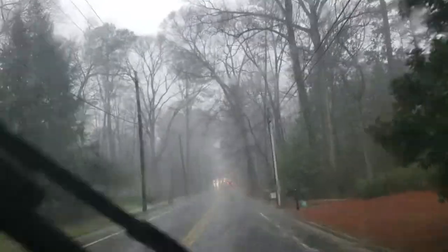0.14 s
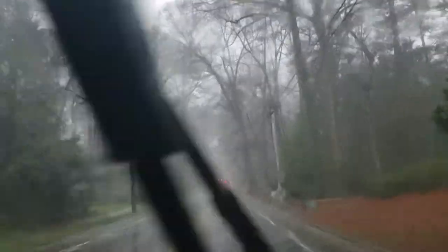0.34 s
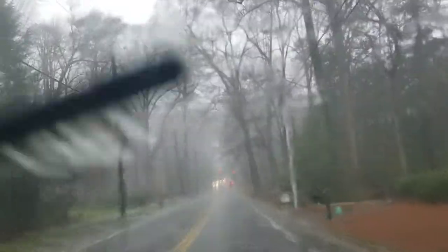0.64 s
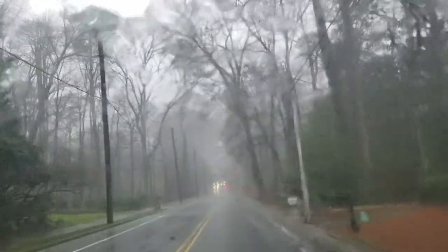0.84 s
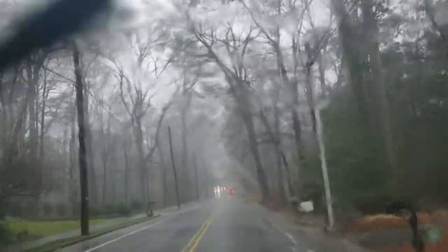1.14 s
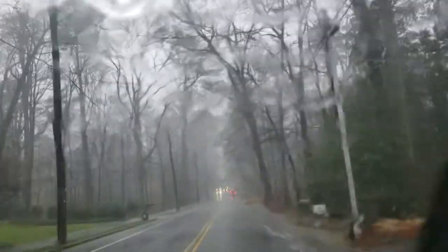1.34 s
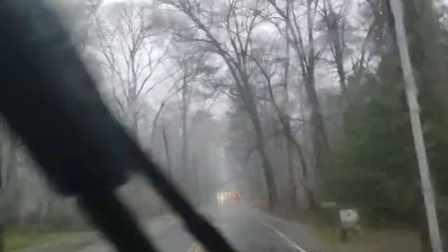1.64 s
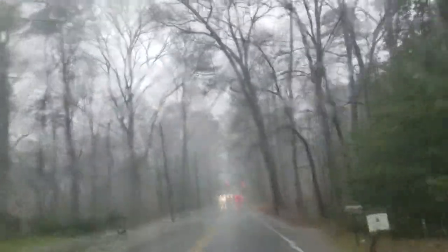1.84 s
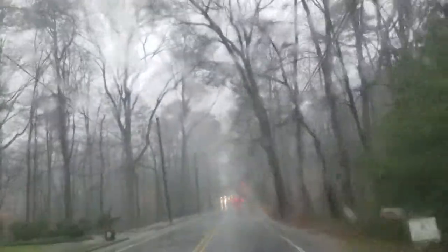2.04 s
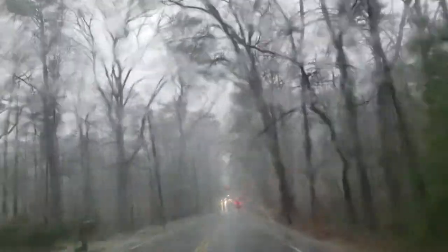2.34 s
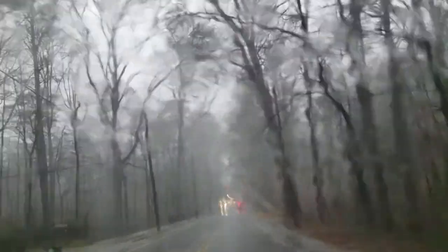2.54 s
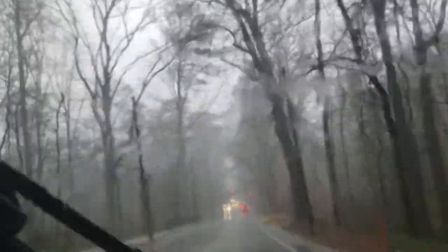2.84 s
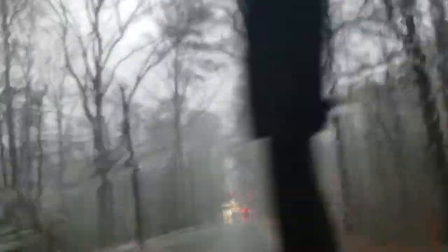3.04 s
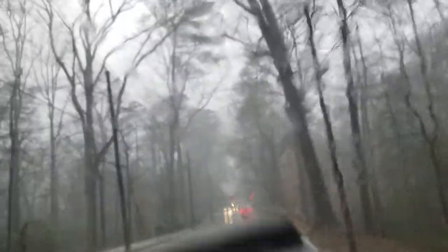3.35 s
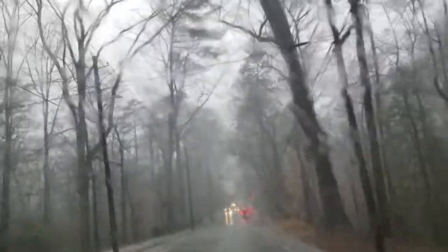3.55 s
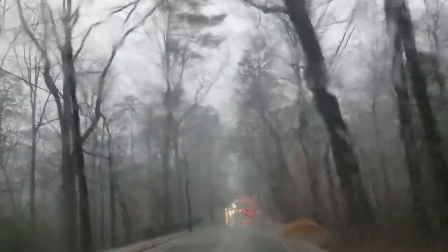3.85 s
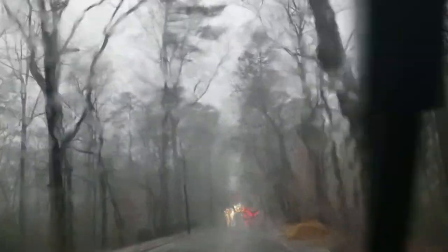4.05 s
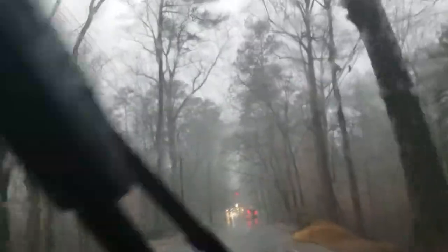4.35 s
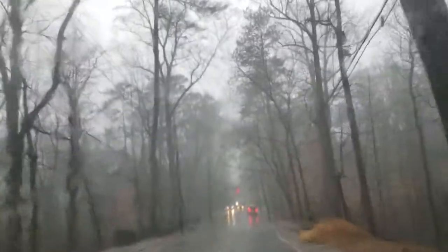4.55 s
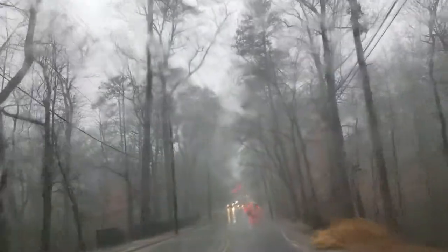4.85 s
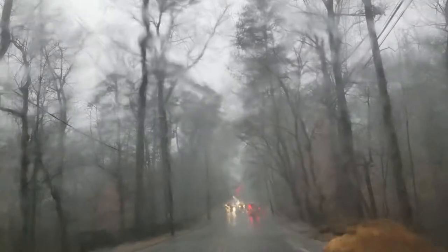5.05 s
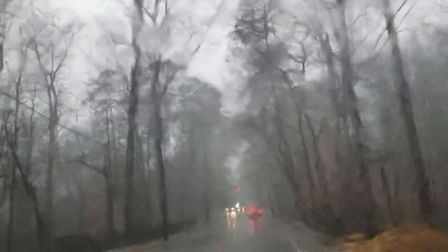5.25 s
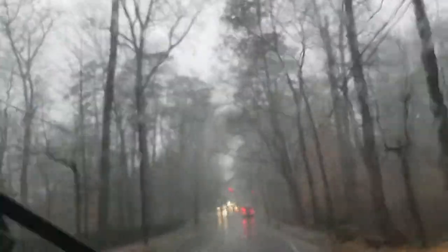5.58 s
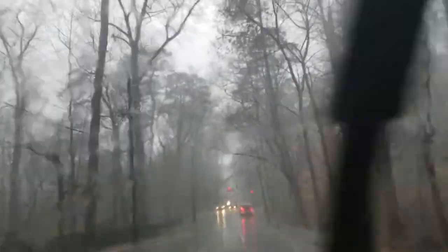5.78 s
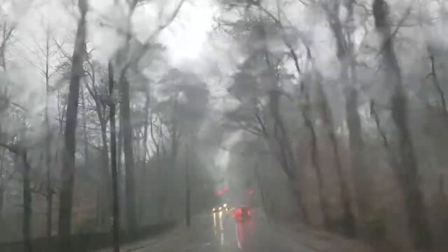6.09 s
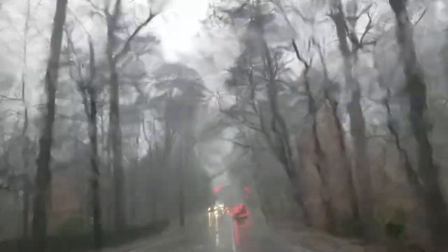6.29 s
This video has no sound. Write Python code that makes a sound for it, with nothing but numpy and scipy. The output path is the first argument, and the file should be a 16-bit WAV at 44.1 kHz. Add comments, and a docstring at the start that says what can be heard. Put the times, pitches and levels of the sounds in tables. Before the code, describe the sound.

From the front seat of a moving car, steady rain hisses and patters on glass and roof. A short wiper hum comes early, the rain thins near one second, then builds again. Dull low bumps jolt the body in the first three seconds. From about two and a half seconds, fat drops crack sharply and densely on the windshield, with brief splashing sheets, over deep tyre rumble and a drone that grows and sinks in pitch.

```python
"""Heavy rain on the windshield and roof of a moving car, heard from the front seat, with fat drops,
drips and sheets of water from the trees; under it tyre rumble, cabin drone, wiper hums and jolts of the body.
Each drop is a noise crack of the glass plus a short cabin ring dying band by band; a sheet briefly lifts the rain.
Tyres are filtered noise, drone and wiper narrow noise bands that follow a pitch, jolts decaying sines with a
burst of knocking noise."""
import sys
import numpy as np
from scipy import signal
from scipy.fft import rfft, irfft
from scipy.io import wavfile
from scipy.ndimage import uniform_filter1d

SR = 44100
rng = np.random.default_rng(int(sys.argv[2]) if len(sys.argv) > 2 else 0)


def to_wav(s):
    """Save 16-bit WAV."""
    ch = np.atleast_2d(s).T  # columns
    pcm = np.round(np.clip(ch, -1, 1) * 32767)  # PCM
    wavfile.write(sys.argv[1], SR, pcm.astype(np.int16))


N = 283122
TIME = np.arange(N) / SR  # s

# strength of the steady rain: t/s, relative level/dB
DOWNPOUR = [(0, -37.5), (.38, -35), (.46, -43.5), (.93, -50.5), (1.0, -44), (1.3, -42.5), (1.76, -38),
            (2.85, -35.5), (3.24, -42.5), (3.95, -38), (4.35, -42), (5.5, -34.5), (6.42, -44)]


def rain(fine_db=2, body_db=1, fizz_db=3.0, coarse_db=0, coarse_dulls=0.22, fizz_growth=0.13,
         roof_db=-12, roof_growth=0.13):
    """Fine and coarse drops on glass and roof; treble and roof drumming grow faster than the water."""
    # coarse drops against the fine rain: t/s, relative level/dB
    coarse_curve = [(0, -10.5), (.6, 8), (1.3, -1), (2.3, -10.5), (2.7, -1), (3.6, 2.5), (4.9, 6.5),
                    (5.3, -14.5), (6, -4.5), (6.42, 9)]
    # sheet metal of the roof, muffled by its lining: f/Hz, relative gain/dB
    roof_spectrum = [(200, -29), (350, 3.5), (550, -7.5), (750, 13.5), (1150, 9), (1500, -1), (2500, -28),
                     (6000, -60)]
    level_db = water_db()
    share_db, = played(coarse_curve)
    fine = gain_of(fine_db) * patter(per_s=1400, spread_db=3.5, colour_db=4.5)
    coarse = gain_of(coarse_db + share_db) * patter(per_s=150, spread_db=6.0, colour_db=14.5)
    drops = fine + coarse

    top = irfft(rfft(drops) * treble(np.fft.rfftfreq(N, 1 / SR)), N)
    body = drops - top
    swell_db = level_db - level_db.mean()
    top_db = fizz_db - coarse_dulls * share_db + fizz_growth * swell_db
    glass = gain_of(level_db) * (gain_of(body_db) * body + gain_of(top_db) * top)

    drumming_db = level_db + roof_db + roof_growth * swell_db
    drumming = coloured(patter(per_s=300, spread_db=8, colour_db=8.5, count=16), roof_spectrum)
    return glass + gain_of(drumming_db) * drumming


def water_db(gust_rms_db=0.71, gust_hz=14.2, rise_s=0.0068, runoff_share=0.14):
    """Water hitting the car: wavering rain plus sheets off the trees, which rise, hold and run out."""
    # sheets: t/s, length/s, relative level/dB
    sheets = [(0.292, 0.095, -39), (.54, 0.18, -41), (2.433, 0.095, -32), (3.296, 0.071, -37.5),
              (3.977, 0.073, -35.5), (4.46, 0.035, -36), (4.9, 0.079, -31), (5.11, 0.35, -34.5),
              (5.796, 0.32, -31)]
    power = gain_of(played(DOWNPOUR)[0]) ** 2
    for s, length_s, db in sheets:
        rise = np.clip((TIME - s) / rise_s, 0, 1)
        fall = np.exp(-np.maximum(TIME - s - length_s, 0) / (runoff_share * length_s))
        power = power + (gain_of(db) * rise * fall) ** 2
    gust_band = [(1, -30), (gust_hz / 2, 0), (gust_hz, 0), (gust_hz * 10, -80)]  # f/Hz, gain/dB
    gusts = coloured(rng.standard_normal(N), gust_band)
    return 10 * np.log10(power) + gust_rms_db * gusts


def patter(per_s, spread_db, colour_db, count=72):
    """Drops at random moments, of random size, drawn from `count` spots of different colour; rms 1."""
    out = np.zeros((2, N))
    spots = []
    for a, b, c in rng.standard_normal((count, 3)):
        spots.append(impact(colour_db * a - 2.0, 2 * b, 2 * c, crack_s=0.00053, ring_db=2))
    chance = rng.random(N)
    sizes_db = spread_db * np.minimum(rng.exponential(1, N), 2)
    sizes = gain_of(sizes_db) * rng.choice([-1, 1], N)
    spot = rng.integers(0, count, N)
    for i in np.flatnonzero(chance < per_s / SR):
        add(out, i / SR, sizes[i] * spots[spot[i]])
    return evened(out)


def fat_drops(level_db=13, lead_s=.0003):
    """The single large drops that stand out of the rain."""
    # fattest drops: t/s, relative level/dB, extra treble/dB, extra hollow body/dB
    drop_rows = [(0.1787, -9, -11, 0), (0.665, -15, -4, 8), (0.7386, -14.5, 3, 9), (0.8803, -16, 12, 4),
                 (1.027, -15, -9, -24), (1.7022, -15.5, 17, -17), (2.3345, -5.5, -3, -8),
                 (2.4774, -3, 10, 4), (2.4828, -2.5, 12, 0), (2.5943, -6.5, -15, 1), (2.6035, -8, -10, 8),
                 (2.615, -.5, 4, 3), (2.6318, -4.5, -5, 1), (2.703, -5, -3, 0.5), (2.8119, -7, 23, 19),
                 (2.84, -8, 1, 12), (2.8948, -7, -2, -3), (2.9118, -4.5, -4.5, -0.5),
                 (2.963, -4.5, -13, -1), (2.971, -7.5, -30, 0), (3.0209, -3.5, 1.5, 3.5),
                 (3.3143, -10.5, -17, 1), (3.4452, -5.5, -7, 4), (3.5283, -5.5, 3, 2.5),
                 (3.6087, -5.5, -5, -2), (3.6482, -7, -17, 3), (3.6778, 2, 9, 4.5), (3.7118, -5, 6, 8),
                 (3.8952, -10, 10, -8), (3.9727, -5.5, -7, 3), (4.0019, -7, -3, 6), (4.0404, -9, -3, 11),
                 (4.093, -4.5, -0.5, -0.5), (4.2645, -4.5, 1.5, -5), (4.3177, -7, 4, 4.5),
                 (4.3851, -8, 9, 6), (4.4452, -7, 3, 2), (4.468, -4.5, -2, -9), (4.4766, -4, -7, -6),
                 (4.5801, -2.5, -3.5, 3.5), (4.6768, -4, 5.5, 0), (4.7472, -9, -20, 18),
                 (4.7701, -9, 8.5, 13), (4.8942, -3.5, -6, -6), (4.953, -14, 8, -4), (5.0408, -10, -12, 1),
                 (5.0898, -7, -13, -7), (5.104, -6, 6, 2), (5.1215, -4, 8, 9), (5.3941, -5.5, 6, 11),
                 (5.4168, -6, 15, -7), (5.4344, -5.5, -3, 11), (5.5583, -6.5, 1, -4), (5.6576, -2, 2.5, -6),
                 (5.6649, -2.5, 4, 1), (5.75, -2.5, 12.5, 9.5), (5.7947, -5.5, 2, -6),
                 (5.8142, -1, 1.5, 7.5), (5.9074, -5, -5, -4)]
    out = np.zeros((2, N))
    for s, db, treble_db, hollow_db in drop_rows:
        add(out, s - lead_s, fat_drop(db + level_db, treble_db, hollow_db))
    return out


def drips(level_db=38.5, spread_db=2, treble_db=-2, hollow_db=4, colour_db=6, count=28):
    """Middling drops off overhanging branches at chance moments, louder in stronger rain, each its own colour."""
    from_s, to_s = 2.6, 6.0
    out = np.zeros((2, N))
    # one drip at random in each equal slot
    times = from_s + (to_s - from_s) * (np.arange(count) + rng.random(count)) / count
    rain_db = np.interp(times, *np.transpose(DOWNPOUR))
    for s, db, (a, b, c) in zip(times, rain_db, rng.standard_normal((count, 3))):
        drip = fat_drop(db + level_db + spread_db * a, treble_db + colour_db * b, hollow_db + colour_db * c)
        add(out, s, drip)
    return out


def fat_drop(db, treble_db, hollow_db, bright_db=1, ring_db=-1, dull_rings=0.22, lean_db=-0.4,
             bright_leans=0.085, scatter_db=2.5):
    """One large drop: bright ones tend to lean left, dull ones ring more strongly after the crack."""
    pan_db = lean_db + bright_leans * treble_db + scatter_db * rng.standard_normal()
    drop_ring_db = ring_db - dull_rings * treble_db
    return gain_of(db) * impact(treble_db + bright_db, hollow_db, pan_db, crack_s=0.00052, ring_db=drop_ring_db)


def impact(bright_db, hollow_db, pan_db, crack_s, ring_db, rise_s=0.00033, apart=1.0, size=4096):
    """One drop: a crack of bending waves in the glass, then the cabin's ring, dying band by band; norm 1."""
    # what the glass passes into the cabin: f/Hz, relative gain/dB
    glass_spectrum = [(150, -21), (350, -1), (650, -1), (1300, -5), (2000, -1), (2900, 1.5), (4500, -2),
                      (5300, -10), (7600, -8), (9000, -12.5), (10500, -9.5), (11900, -4.5), (13800, -11)]
    # side balance before panning: f/Hz, left minus right/dB
    side_spectrum = [(300, 2.5), (1300, 0.5), (2400, 3), (4400, 9), (8000, 5), (15000, 9)]
    # ring of glass and cabin: f/Hz, t60/s
    ring_t60 = [(300, 0.15), (1500, 0.066), (4000, 0.046), (12000, 0.036)]
    # ring energy against the crack: f/Hz, relative level/dB
    ring_spectrum = [(300, 5), (1200, 2), (3500, 2.5), (12000, 1)]
    right_delay_s = .0005
    t, hz = np.arange(size) / SR, np.fft.rfftfreq(size, 1 / SR)

    shared, *own = rng.standard_normal((3, size))
    crack_envelope = (1 - np.exp(-(t / rise_s) ** 2)) * np.exp(-t / crack_s)
    crack = (shared + apart * np.array(own)) * crack_envelope
    crack[1] = later(crack[1], right_delay_s)
    crack /= np.linalg.norm(crack, axis=1, keepdims=True)

    centres = np.geomspace(300, 12000, num=4)  # Hz
    shares = np.array([read(np.transpose([centres, row]), hz) for row in np.eye(len(centres))])
    bands = irfft(rfft(rng.standard_normal((2, 1, size))) * shares)
    bands[1, 0] = later(bands[0, 0], right_delay_s)  # lowest band: same waveform left and right
    decay = np.exp(-np.log(1000) * t / read(ring_t60, centres)[:, None])
    fade = decay * (1 - np.exp(-t / 0.00018))
    band_gain = gain_of(read(ring_spectrum, centres) + ring_db)[:, None]
    fade *= band_gain / np.linalg.norm(fade, axis=1, keepdims=True)
    ring = (bands * fade).sum(1)

    colour_db = read(glass_spectrum, hz) + bright_db * treble(hz) + hollow_db * hollow(hz)
    sides_db = np.array([[.5], [-.5]]) * (read(side_spectrum, hz) + pan_db)
    sound = causal(crack + ring, colour_db + sides_db)
    return sound / np.linalg.norm(sound)


def treble(hz):
    """High-pass weight: 0 in the body of a drop's sound, 1 in its treble."""
    return 1 / (1 + (5500 / (hz + 1)) ** 4)


def hollow(hz):
    """Low-pass weight: 1 in the low, hollow part of a drop's sound, 0 above."""
    return 1 / (1 + (hz / 1700) ** 4)


def jolts(level_db=-1.5, swell_s=0.0078, knock_db=-23.5, knock_growth=1.33, knock_rise_s=0.024, knock_s=0.078):
    """Bumps heave the body, which swings for a few cycles; trim knocks, the more so the heavier the bump."""
    # jolts: t/s, relative level/dB, f/Hz
    jolt_rows = [(0.859, -12.5, 64.1), (1.371, -11, 100), (1.466, -11, 77), (1.542, -8.5, 85),
                 (2.002, -14, 53.5), (2.088, -14, 52), (2.797, -10.5, 79), (2.848, -9.5, 93),
                 (2.962, -14.5, 81), (3.088, -8.5, 67)]
    # trim and panels knocked by a jolt: f/Hz, relative gain/dB
    knock_spectrum = [(100, 8), (200, 3.5), (340, 2.5), (480, -12.5), (700, -9), (1500, -36), (4000, -70)]
    out, shake, t = np.zeros((2, N)), np.zeros((2, N)), np.arange(SR // 2) / SR
    heaviest_db = max(db for _, db, _ in jolt_rows)
    knock = (1 - np.exp(-t / knock_rise_s)) * np.exp(-t / knock_s)
    for s, db, hz in jolt_rows:
        swing = t / swell_s * np.exp(1 - t / swell_s) * np.sin(2 * np.pi * hz * t)
        add(out, s, gain_of(db + level_db) * swing[None])
        add(shake, s, gain_of(knock_db + knock_growth * (db - heaviest_db)) * knock[None])
    return out + shake * cabin_noise(knock_spectrum, apart=0.78)


def road(rumble_db=0.0, boom_db=-1.0, rattle_db=-36.0, rattle_growth=0.35):
    """Tyres shake the body: deep rumble, boom of the cabin's air, lighter rattle that grows with the boom."""
    # road under the tyres, rough or smooth: t/s, relative rumble level/dB, relative boom level/dB
    road_curve = [(0, -28, -24.5), (.9, -26, -25), (1.13, -31, -25.5), (1.27, -40, -34), (1.42, -26, -22),
                  (1.65, -31, -23.5), (2.12, -24, -25), (2.4, -32.5, -28.5), (2.68, -40, -29),
                  (2.85, -24, -24.5), (3.12, -24.5, -22.5), (3.45, -30, -27.5), (4.15, -33, -27),
                  (4.55, -34, -24), (5.8, -32.5, -24.5), (6.1, -30, -32), (6.42, -33, -31.5)]
    # tyre rumble, cabin air, body rattle: f/Hz, relative gain/dB
    rumble_spectrum = [(10, -34), (25, -8), (40, 21), (54, 11.5), (64, 25.5), (85, -8.5), (200, -52)]
    boom_spectrum = [(35, -23), (56, -4), (70, -1.5), (88, -5.5), (108, -5.5), (160, -13.5), (230, -25),
                     (500, -104)]
    rattle_spectrum = [(90, -69), (170, 3.5), (205, 0), (255, 0), (300, -4), (400, -11), (600, -14),
                       (1000, -25.5), (2500, -34)]
    deep_db, low_db = played(road_curve)
    rumble = steadied(cabin_noise(rumble_spectrum, apart=0.2), seconds=0.071)
    boom = steadied(cabin_noise(boom_spectrum, apart=0.37), seconds=0.092)
    rattle = steadied(cabin_noise(rattle_spectrum, apart=0.42), seconds=0.214)
    panels_db = rattle_db + rattle_growth * (low_db - low_db.mean())
    return gain_of(deep_db + rumble_db) * rumble + gain_of(low_db + boom_db) * boom + gain_of(panels_db) * rattle


def drone(level_db=-1):
    """Engine and tyres drive a narrow boom of the cabin, which varies in level and sinks in pitch."""
    # drone: t/s, relative level/dB, f/Hz
    drone_curve = [(0, -38.5, 149.4), (1.4, -31, 149.6), (2.5, -33.5, 151.1), (3.7, -31.5, 148.9),
                   (4.7, -30.5, 145), (5.3, -24.5, 138), (5.55, -29, 131.4), (5.9, -21.5, 127.1),
                   (6.42, -23.5, 124.1)]
    return gain_of(level_db) * hum(*played(drone_curve), width_hz=5, apart=.27)


def wiper(fade_db_per_s=145, sag_hz_per_s=60):
    """The blade drags over the glass: each hum swells and fades as its pitch sags."""
    # hums at their peak: t/s, level/dB, f/Hz
    wiper_rows = [(.33, -28, 243), (0.718, -34.5, 257)]
    out = np.zeros((2, N))
    for s, db, hz in wiper_rows:
        level_db = db - fade_db_per_s * abs(TIME - s)
        out += hum(level_db, hz - sag_hz_per_s * (TIME - s), width_hz=12, apart=0.17)
    return out


def hum(db, hz, width_hz, apart):
    """A narrow resonance driven by noise, following a level and a pitch."""
    band = 1 / (1 + (np.fft.fftfreq(N, 1 / SR) / width_hz) ** 2)
    noise = rng.standard_normal((3, N)) + 1j * rng.standard_normal((3, N))
    shared, *own = np.fft.ifft(band * noise)
    carrier = np.exp(2j * np.pi * np.cumsum(hz) / SR)
    tone = ((shared + apart * np.array(own)) * carrier).real
    return gain_of(db) * steadied(evened(tone), seconds=0.13)


def cabin_noise(points, apart):
    """Noise filling the cabin: one part common to both channels, one part (scaled by apart) of each; rms 1."""
    shared, *own = rng.standard_normal((3, N))
    return coloured(shared + apart * np.array(own), points)


def steadied(x, seconds):
    """Evens out slow swells of a noise by its running rms."""
    return x / np.sqrt(uniform_filter1d((x ** 2).mean(0), max(int(seconds * SR), 1)) + 1e-9)


def coloured(x, points):
    """Filters a long sound by a spectrum table; rms 1."""
    gain = gain_of(read(points, np.fft.rfftfreq(N, 1 / SR)))
    return evened(irfft(rfft(x) * gain, N))


def causal(x, db):
    """Filters a short sound by a dB curve with minimum phase, so that its attack stays sharp."""
    log_gain = np.log(gain_of(np.concatenate([db, db[..., -2:0:-1]], -1)))
    return np.fft.ifft(np.fft.fft(x) * np.exp(np.conj(signal.hilbert(log_gain)))).real


def gain_of(db):
    """Decibels to an amplitude factor."""
    return 10 ** (np.asarray(db) / 20)


def evened(x):
    """Scales to rms 1."""
    return x / np.sqrt(np.mean(x ** 2) + 1e-20)


def read(points, hz):
    """Interpolates a spectrum table on a log-frequency axis."""
    f, value = np.transpose(points)
    return np.interp(np.log(hz + 1), np.log(f + 1), value)


def played(rows):
    """Each column of a curve table, sample by sample."""
    s, *columns = np.transpose(rows)
    return [np.interp(TIME, s, c) for c in columns]


def later(x, seconds):
    """Delays a sound by a whole number of samples."""
    return np.pad(x, (max(round(seconds * SR), 0), 0))[:len(x)]


def add(mix, s, sound):
    """Lays a sound into the stereo mix at time s."""
    part = mix[:, max(round(s * SR), 0):][:, :sound.shape[1]]
    part += sound[:, :part.shape[1]]


def scene():
    """The car's low sounds, leaning left, with the rain over them."""
    lean_db = 1.3  # left up, right down by this much
    car = (road() + drone() + wiper() + jolts()) * gain_of([[lean_db], [-lean_db]])
    return car + rain() + drips() + fat_drops()


def record(dry, ceiling=.85, edge_hz=15800):
    """Clips at the ceiling, then low-passes with a linear-phase filter."""
    lowpass = signal.firwin(1023, edge_hz, window=("kaiser", 7), fs=SR)
    held = np.clip(dry, -ceiling, ceiling)
    return signal.oaconvolve(held, lowpass[None], "same")


dry = scene()
out = record(dry)
to_wav(out)
```